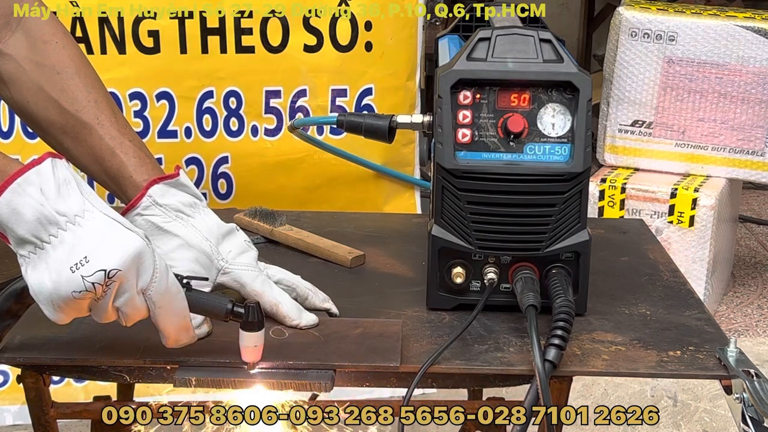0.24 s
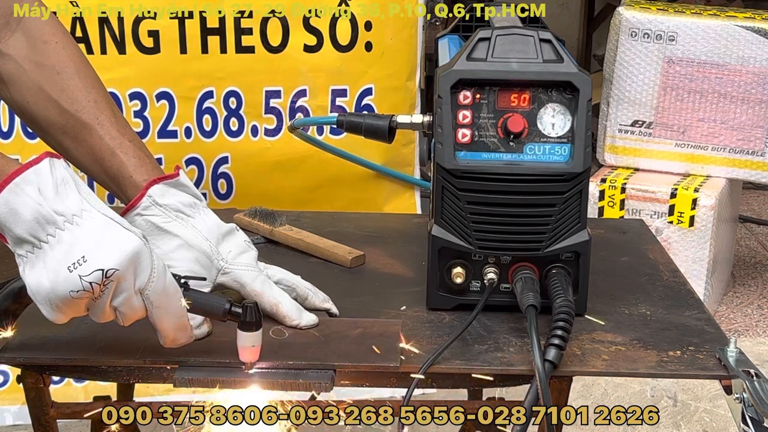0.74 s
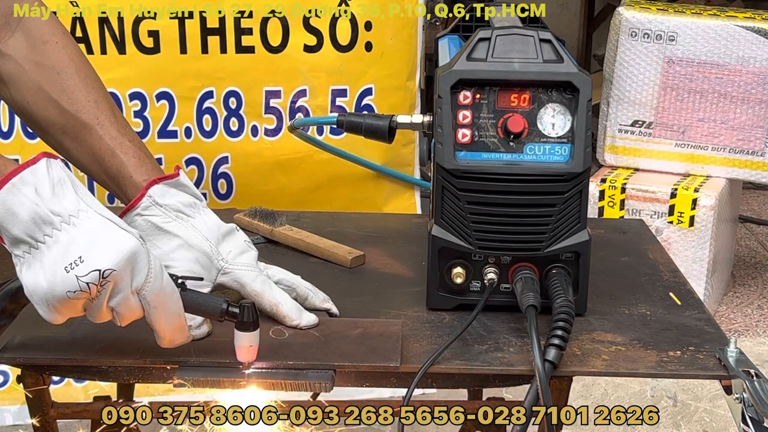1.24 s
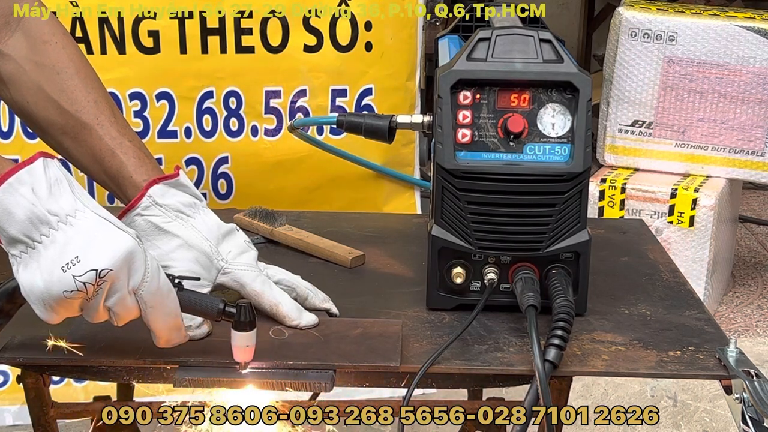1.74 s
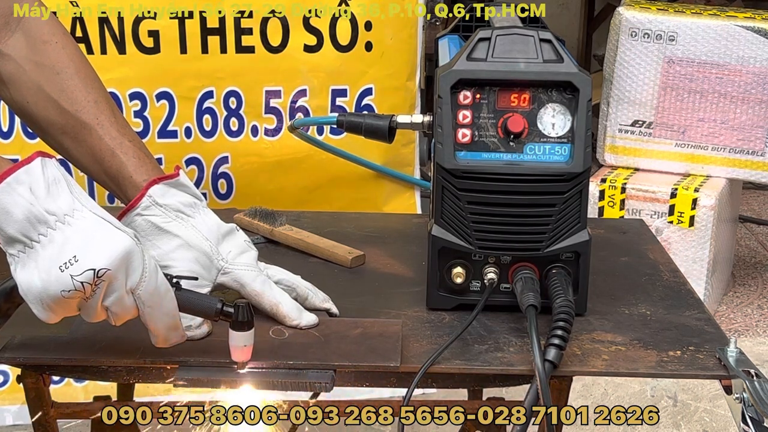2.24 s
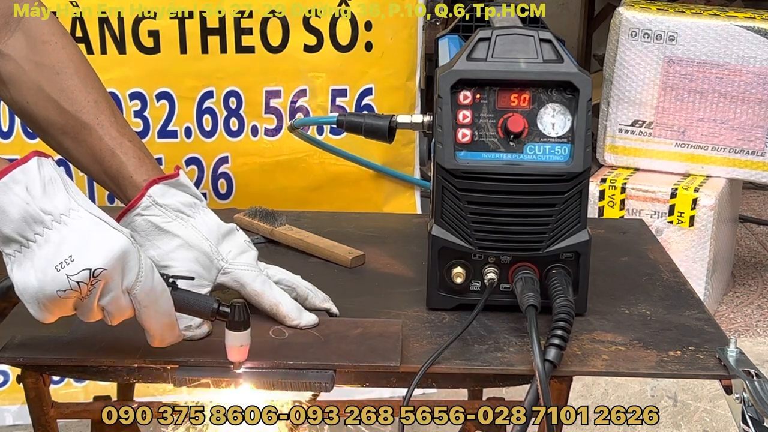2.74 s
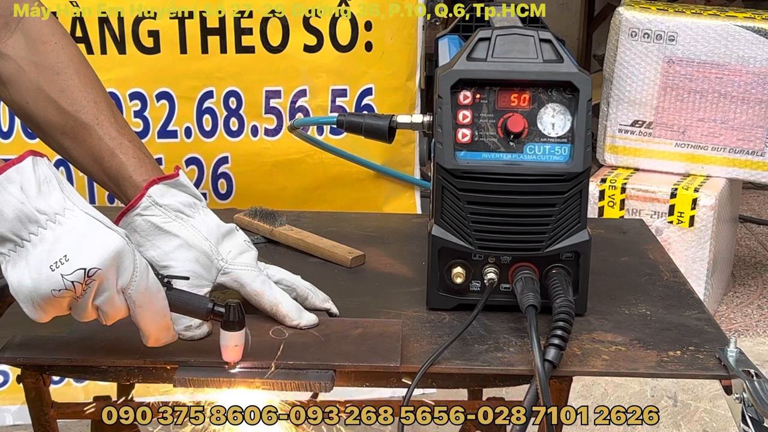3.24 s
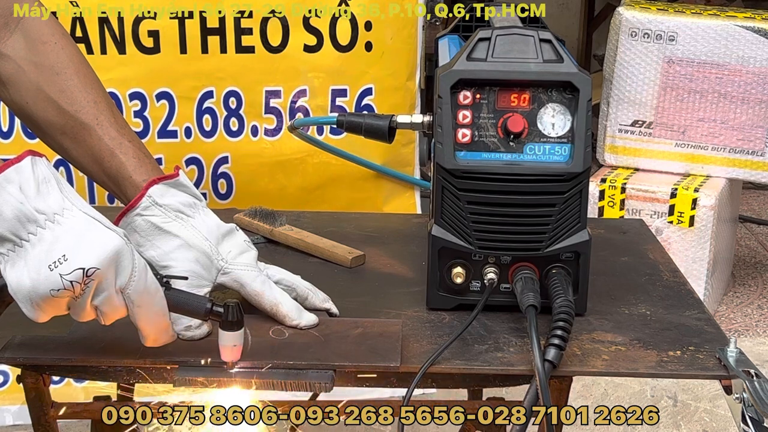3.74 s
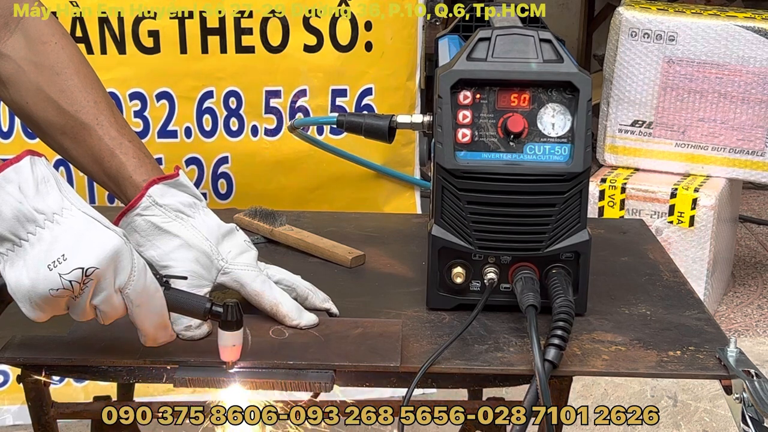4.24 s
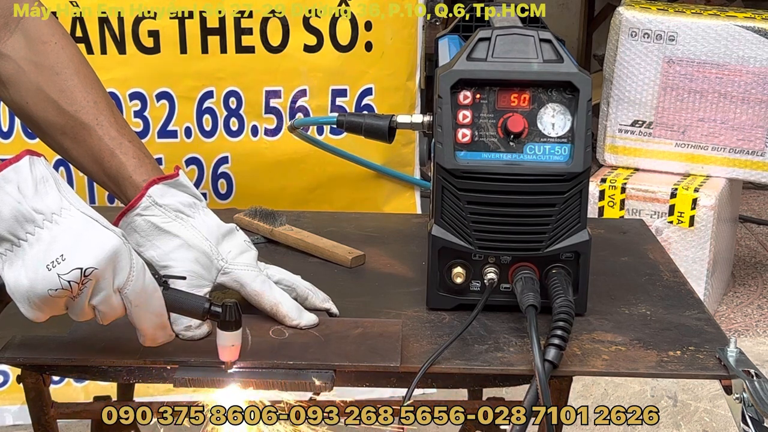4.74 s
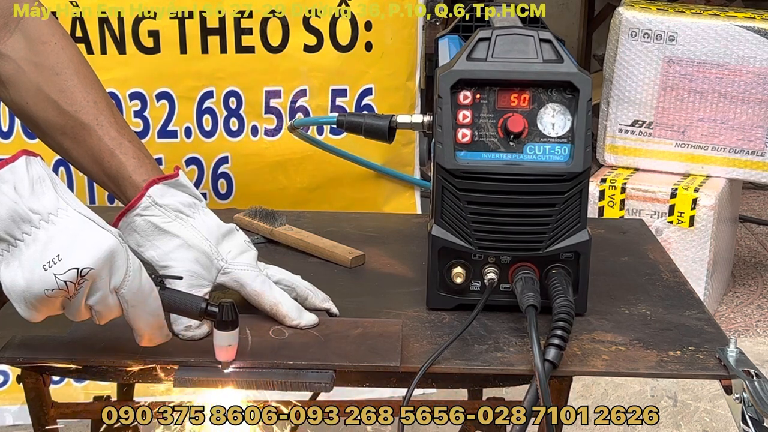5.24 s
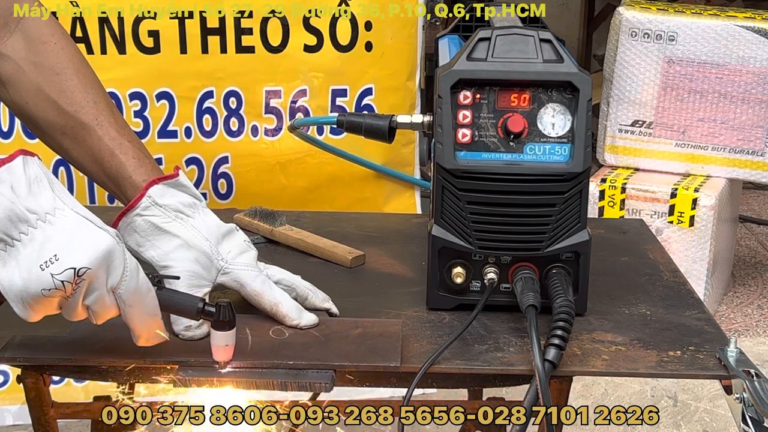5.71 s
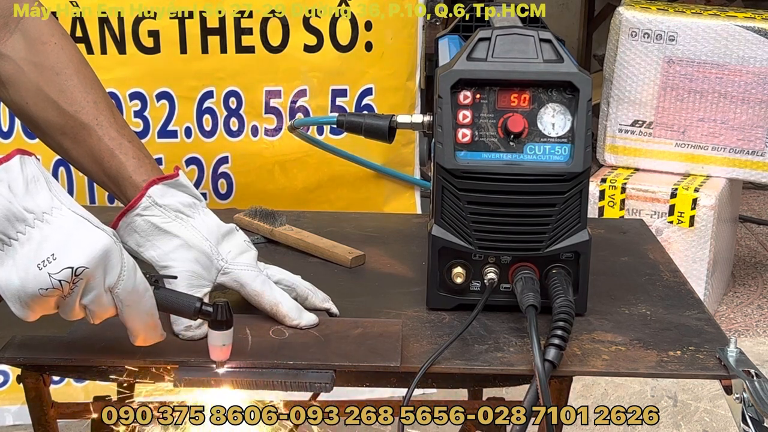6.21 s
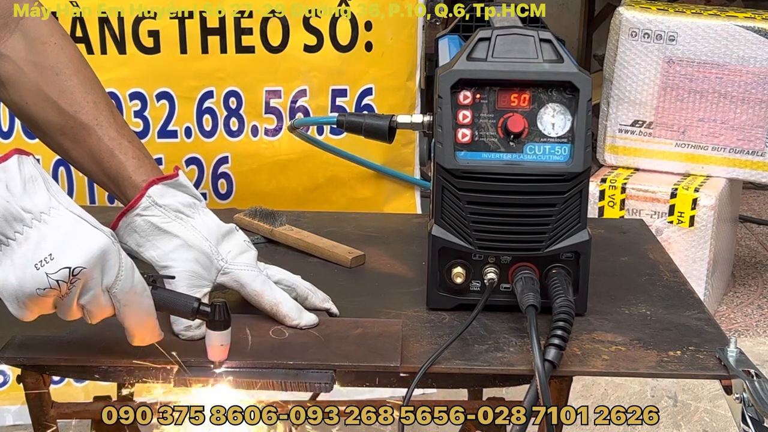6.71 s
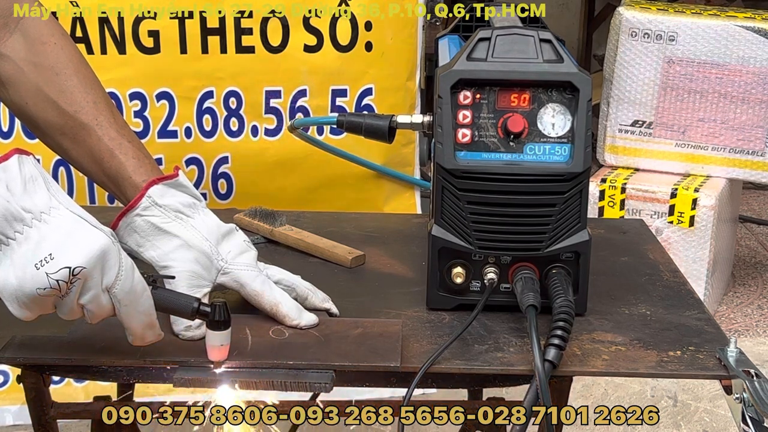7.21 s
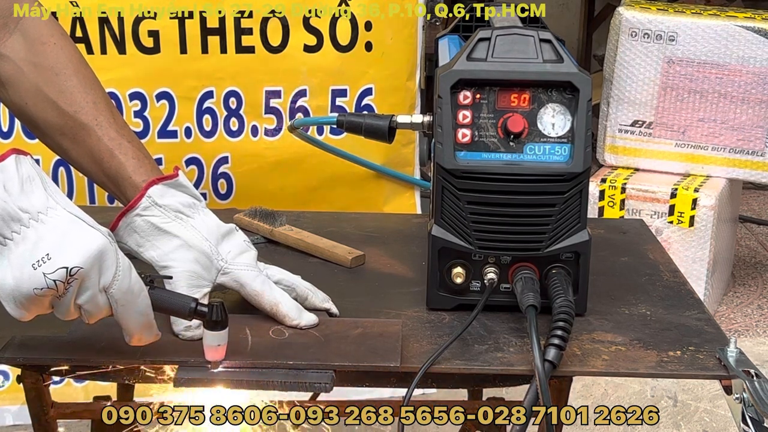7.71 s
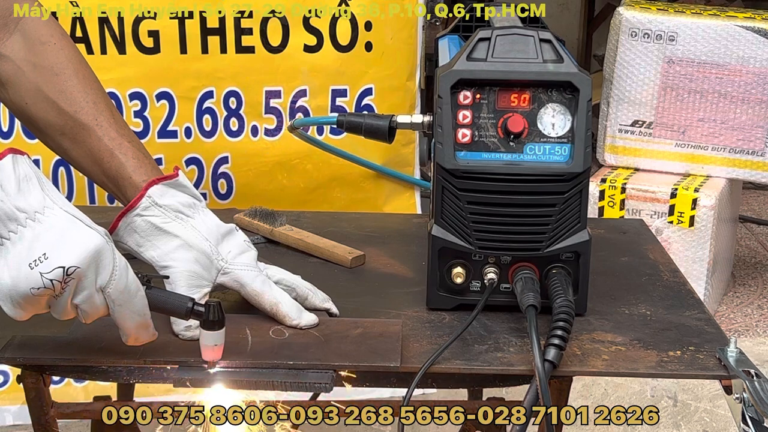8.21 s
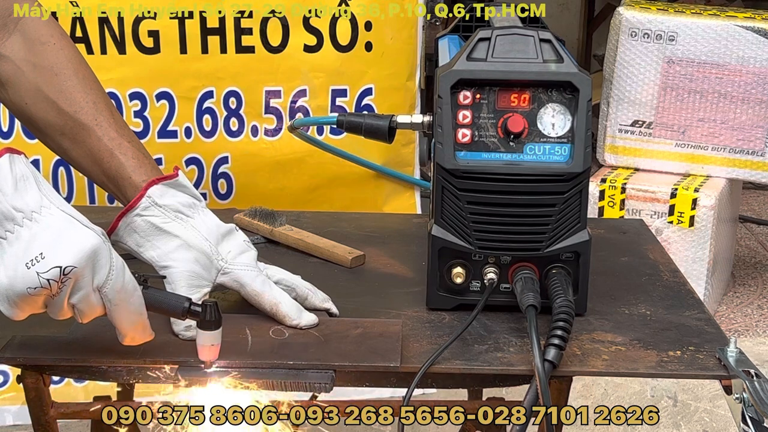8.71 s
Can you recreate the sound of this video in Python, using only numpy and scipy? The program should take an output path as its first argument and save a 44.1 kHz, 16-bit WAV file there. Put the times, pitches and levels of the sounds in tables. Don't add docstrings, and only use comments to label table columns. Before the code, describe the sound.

From 0 seconds a plasma torch is already cutting a steel bar at full force, and it continues unbroken to about 9 seconds. The sound is a loud, dense gas hiss, brightest at the very top with a blurred nozzle whistle, over a rough blowing roar and a hollow midrange ring from the gap beneath the metal. Soft dips of a tenth of a second or so recur irregularly, roughly two or three per second, deeper near 1.8, 3.2, 3.5, 6.5 and 8.7. The hiss spurts sharply near 5.2 and again around 5.7, where a short low puff blows out slag. The hollow ring strengthens around 6.3, then thins near 7 as a higher airy ring swells at about 7.15 and fades by 7.8. Fine flicker roughens everything. The microphone is close, nearly mono, with faint drifting reflections off nearby surfaces.

```python
import sys
import numpy as np
from scipy import signal
from scipy.io import wavfile
from scipy.ndimage import uniform_filter1d

SR = 44100
rng = np.random.default_rng(int(sys.argv[2]) if len(sys.argv) > 2 else 0)


def unload_wav(signal):
    wavfile.write(
        sys.argv[1],
        SR,
        np.round(np.clip(np.atleast_2d(signal).T, -1, 1) * 32767).astype(np.int16),
    )


def gain_from_db(level_db):
    decades = np.asarray(level_db, float) / 20
    return 10 ** decades


N = 395136

# (time [s], level [dB])
OPENING = [(0, 1.5), (.6, -1.4), (.85, 1), (1.7, -.5), (2.05, 0.8), (3.05, 1), (4.0, 0.5), (4.55, -1.5),
           (5.0, -0.6), (5.7, 0.5), (6.0, -0.8), (6.3, 2), (6.85, .7), (7.05, -2.5), (7.5, -0.5),
           (8.2, 1.3), (8.42, -0.3), (8.96, 1)]


def jet():
    region_edges_hz = (11500, 6500, 3000)
    # (time [s], level [dB], half length [s])
    slag_puff = (5.72, 3, 0.037)
    frame, hop = 2048, 512
    hz = np.fft.rfftfreq(frame, 1 / SR)[:, None]
    t = np.arange(N // hop + 5) * hop / SR
    shape = (len(hz), len(t))

    treble = np.clip(hz / 9000, 0, 1)
    echo_db = (0.51 + 1.07 * treble) * patches(shape, 4, 28)
    slag_db = 0.66 * patches(shape, 24, 4)
    power = colour(hz, t) * gain_from_db(2 * (echo_db + slag_db))

    edges_hz = (15700, *region_edges_hz, 600)
    centres_hz, gains_db = [], []
    for top_hz, low_hz, strength_db in zip(edges_hz, edges_hz[1:], strengths(t)):
        band = ((hz >= low_hz) & (hz < top_hz))[:, 0]
        slow_power = uniform_filter1d(power[band].sum(0), size=10)
        gains_db.append(strength_db - 10 * np.log10(slow_power))
        centres_hz.append(np.sqrt(top_hz * low_hz) + (low_hz < 1000) * 1100)

    puff_s, puff_peak_db, puff_half_s = slag_puff
    puff_db = puff_peak_db * np.exp(-((t - puff_s) / puff_half_s) ** 2)
    centres_hz.append(400)
    gains_db.append(uniform_filter1d(gains_db[-1], size=150) + puff_db)

    place = np.interp(hz, centres_hz[::-1], np.arange(5.)[::-1])
    gain_db = sum(np.clip(1 - abs(place - k), 0, 1) * g for k, g in enumerate(gains_db))
    real, imag = rng.standard_normal((len(t), len(hz), 2)).T
    spectra = (real + 1j * imag) * np.sqrt(power * 1.378) * gain_from_db(gain_db + 0.5)
    return signal.istft(spectra, nperseg=frame, noverlap=frame - hop)[1][:N]


def strengths(t):
    # (time [s], level [dB])
    gas_flow = [(0, -0.7), (.6, 1), (1.2, 0.5), (2.2, -1), (3.4, 0), (4.5, 0), (5.6, -1), (6.8, 1),
                (7.4, 0.3), (8.0, 0.4), (8.96, 0)]
    # (time [s], depth [dB], half length [s])
    slag_chokes = [(0.29, 2, 0.15), (0.85, 1.4, 0.09), (1.03, 1.4, 0.044), (1.45, 1.9, 0.076),
                   (1.84, 3.5, 0.064), (2.32, 1.9, 0.081), (2.78, 2.5, 0.097), (3.18, 3.5, 0.086),
                   (3.475, 4, 0.1), (3.96, 1.5, 0.25), (4.23, 1, 0.07), (4.723, 2, 0.067),
                   (5.134, 2.5, 0.073), (5.55, 2.2, 0.063), (5.977, 2, 0.072), (6.48, 3, 0.1),
                   (6.98, 1.5, 0.071), (7.24, 0.5, 0.041), (7.61, 2.5, 0.04), (8.02, 2.1, 0.104),
                   (8.34, 1.9, 0.08), (8.72, 3.5, 0.056)]
    # (time [s], level [dB])
    arc_spurts = [(.51, -0.5), (.83, -.7), (1.27, .8), (1.43, -.6), (2.52, 0), (3.06, 1.2), (3.5, -.6),
                  (4.1, .7), (4.51, -0.5), (5.22, 2.5), (5.54, 0), (5.73, 2), (5.88, -1), (6.43, 1.5),
                  (7.02, -1.5), (7.44, 1), (7.86, -1.5), (8.74, -.7)]
    # (level [dB], travel [dB/s], share of flow [1], choke [1], spurt [1], opening [1])
    jet_layers = [
        (-17.5, 0.03, 1.0, 0.34, 1.0, 0.01),
        (-22.5, 0.11, 0.19, 0.86, .05, 0.01),
        (-28, 0.0451, .8, 0.92, .01, 0.01),
        (-26, -0.0225, .01, 0.69, .1, 0.67),
    ]
    spurt_half_s = .05
    controls = [
        np.ones(len(t)),
        t,
        np.interp(t, *np.transpose(gas_flow)),
        -bumps(t, *np.transpose(slag_chokes)),
        bumps(t, *np.transpose(arc_spurts), spurt_half_s),
        np.interp(t, *np.transpose(OPENING)),
    ]
    return np.array(jet_layers) @ controls


def colour(hz, t):
    # (frequency [Hz], density [dB/Hz])
    jet_noise = [(25, -37.5), (60, -26.5), (150, -22), (300, -16.5), (500, -13.5), (1000, -17.5),
                 (3000, -16.5), (5000, -15.5), (8200, -15), (10500, -11.5), (12300, -9.5), (14100, -9),
                 (15700, -6.5)]
    # (frequency [Hz], width [Hz], level over jet noise [dB])
    air_rings = [(826, 84, 6.5), (1217, 186, 7.5), (2273, 110, 9.5), (2455, 170, 8.5), (583, 100, -6),
                 (1610, 300, 3), (1810, 74, 7.5), (2053, 174, 13.5), (2653, 290, 3), (3900, 540, 1),
                 (5570, 550, -2.5), (6430, 1000, -4.5), (7310, 1320, 3), (8830, 250, 0.5), (9500, 930, -2),
                 (10920, 630, -0.5), (11370, 710, -3.5)]
    # (frequency [Hz], width [Hz], level over jet noise [dB])
    nozzle_rings = [
        (13450, 800, 2.2),
        (14850, 900, 4.5),
        (15450, 700, .6),
    ]
    # (time [s], level over jet noise [dB])
    slot_ring = [
        (0, -8),
        (3, -18),
        (5, -6),
        (6.9, -8),
        (7.15, 8),
        (7.45, 3),
        (7.8, -2),
        (8.96, -1),
    ]
    # (share of opening [1], travel [dB/s])
    gap_drive = [
        (2.5, 0.07),
        (0.95, -0.1),
        (.1, -0.3),
        (.1, -0.45),
    ]
    slot_hz, slot_width_hz = 5240, 520
    ring_sag_per_s, whistle_sag_per_s = 0.0023, 0.0052

    travel_s = t - t.mean()
    rings = air_rings + nozzle_rings
    waver_db = .5 * patches((len(rings), len(t)), 1, 20)
    waver_db[:4] += np.array(gap_drive) @ [np.interp(t, *np.transpose(OPENING)), travel_s]
    sags_per_s = [ring_sag_per_s] * len(air_rings) + [whistle_sag_per_s, 0, 0]

    slot_db = np.interp(t, *np.transpose(slot_ring))
    lift = 1 + gain_from_db(2 * slot_db) * peak(hz, slot_hz, slot_width_hz)
    for (centre_hz, width_hz, ring_db), more_db, sag_per_s in zip(rings, waver_db, sags_per_s):
        moving_hz = centre_hz * (1 - sag_per_s * travel_s)
        lift = lift + gain_from_db(2 * (ring_db + more_db)) * peak(hz, moving_hz, width_hz)
    noise_hz, noise_db = np.transpose(jet_noise)
    return gain_from_db(2 * np.interp(np.log(hz + 1), np.log(noise_hz), noise_db)) * lift


def flutter(x, slow_db=0.35, fast_db=0.58, above_hz=11000):
    shakes = []
    for samples in (900, 120):
        smooth = uniform_filter1d(rng.standard_normal(N), samples)
        shakes.append(evened(uniform_filter1d(smooth, samples)))
    flicker_db = slow_db * shakes[0] + fast_db * shakes[1]
    body_db = .5 * flicker_db[::-1]
    highpass = signal.butter(2, above_hz, "high", fs=SR, output="sos")
    top = signal.sosfiltfilt(highpass, x)
    return top * gain_from_db(flicker_db) + (x - top) * gain_from_db(body_db)


def peak(hz, centre_hz, width_hz):
    return 1 / (1 + (2 * (hz - centre_hz) / width_hz) ** 2) ** 2


def bumps(t, s, db, half_s):
    return (db * np.exp(-((t[:, None] - s) / half_s) ** 2)).sum(axis=1)


def patches(shape, bins, frames):
    field = rng.standard_normal(shape[::-1]).T
    for _ in range(2):
        field = uniform_filter1d(field, bins, 0)
        field = uniform_filter1d(field, frames, 1)
    return evened(field)


def evened(x):
    return x / np.sqrt(np.mean(x ** 2) + 1e-20)


def scene():
    return np.tile(flutter(jet()), (2, 1))


def fills():
    # (time [s], low edge [Hz], high edge [Hz])
    single_fills = [(0.084, 6890, 8290), (0.479, 6280, 8980), (0.572, 13760, 15230), (0.804, 12380, 13830),
                    (0.897, 8950, 10380), (1.222, 8270, 12430), (1.803, 8930, 11050), (1.896, 5160, 6890),
                    (2.128, 6890, 9690), (2.592, 4630, 6310), (2.592, 11670, 13140), (2.755, 5680, 6920),
                    (3.219, 9620, 11070), (8.281, 7580, 9000), (4.264, 5660, 6940), (4.659, 13090, 14520),
                    (5.054, 8930, 10380), (5.889, 5680, 6920), (5.889, 11800, 13830), (6.122, 7580, 9000),
                    (8.42, 7580, 8980), (7.84, 5680, 6940), (7.84, 14420, 15890), (8.188, 7560, 9000),
                    (8.281, 13070, 14540), (8.513, 8240, 9690), (8.513, 14420, 15890), (8.629, 4220, 6920),
                    (8.792, 13070, 14540), (8.908, 11800, 14400)]
    lowest_fills_s = [.804, 1.083, 2.151, 2.755, 5.077, 6.586, 7.84]
    lowest_band_hz = (4220, 5200)
    low_fills_s = [3.684, 8.119, 8.513, 8.583, 8.908]
    low_band_hz = (4800, 6100)
    base_db, slope_db = -43.5, 1.34
    half, grid = 1024, 652

    events = list(single_fills)
    events += [(s, *lowest_band_hz) for s in lowest_fills_s]
    events += [(s, *low_band_hz) for s in low_fills_s]
    bursts = np.zeros(N + 2 * half)
    window = signal.windows.kaiser_bessel_derived(2 * half, 4 * np.pi)
    place = np.arange(2 * half) + (half + 1) / 2
    lines = np.arange(half) + .5
    for s, low_hz, high_hz in events:
        width_db = 10 * np.log10((high_hz - low_hz) / 1e3)
        db = base_db + slope_db * (low_hz + high_hz) / 2500.0 + width_db
        noise = rng.standard_normal(half)
        used = (lines > low_hz * 2 * half / SR + 2) & (lines < high_hz * 2 * half / SR - 2)
        band = noise[used] @ np.cos(np.pi / half * np.outer(lines[used], place))
        start = grid + half * (round((s * SR - grid) / half) - 1)
        bursts[start:start + 2 * half] += gain_from_db(db + 1.0) * evened(band) * window
    return bursts[:N]


def band_limit(x):
    return signal.sosfilt(signal.butter(12, 17040, fs=SR, output="sos"), x)


def record(dry):
    lowpass = signal.firwin(2047, 15745, window=("kaiser", 11), fs=SR)
    limited = signal.oaconvolve(dry, lowpass[None], "same", axes=1)
    mix = limited + np.outer([1, -1], fills())
    return band_limit(mix)


dry = scene()
out = record(dry)
unload_wav(out)
```